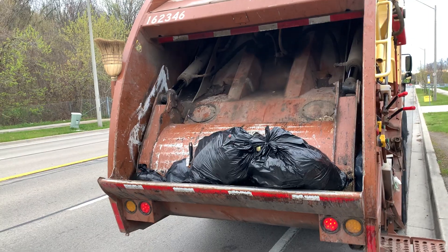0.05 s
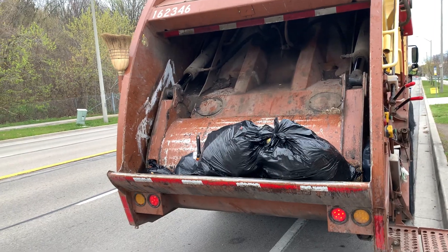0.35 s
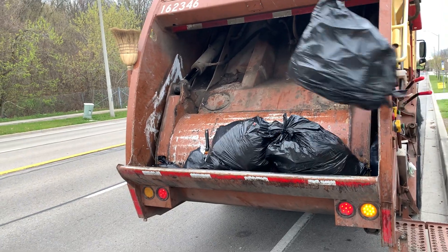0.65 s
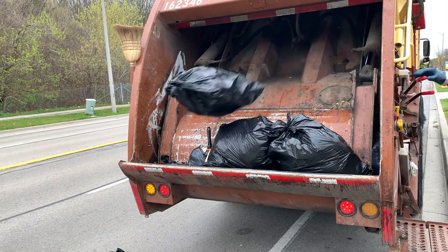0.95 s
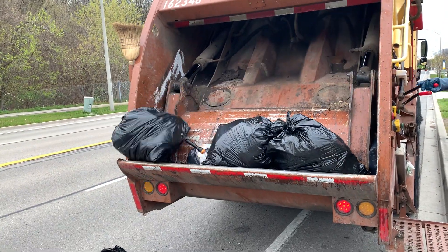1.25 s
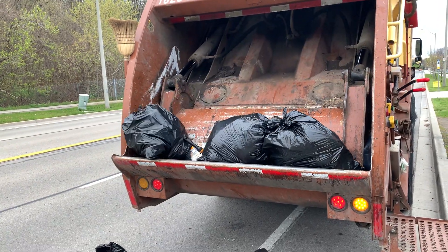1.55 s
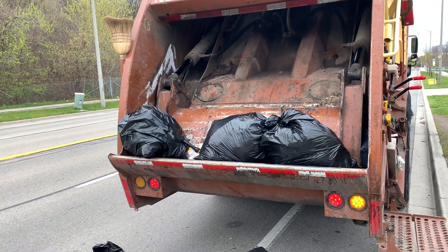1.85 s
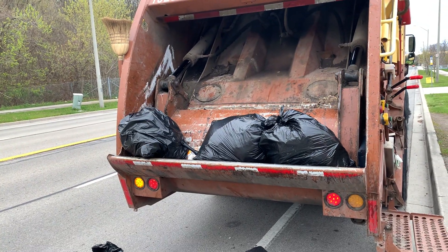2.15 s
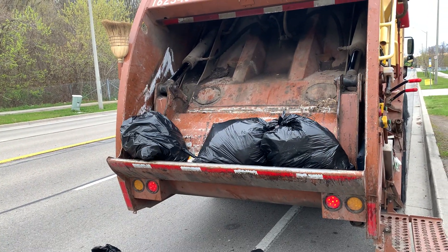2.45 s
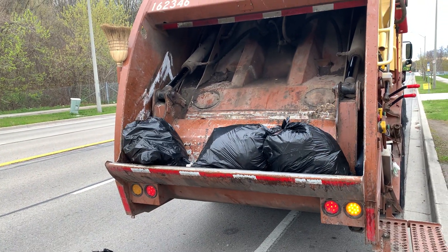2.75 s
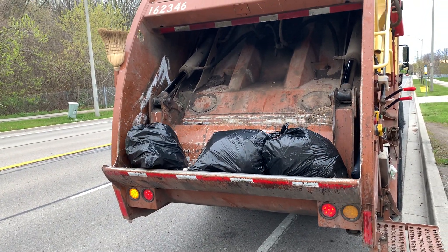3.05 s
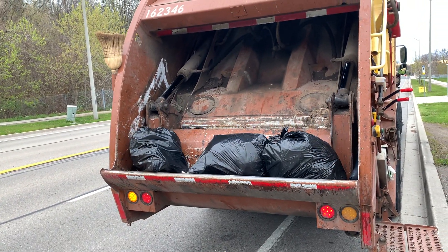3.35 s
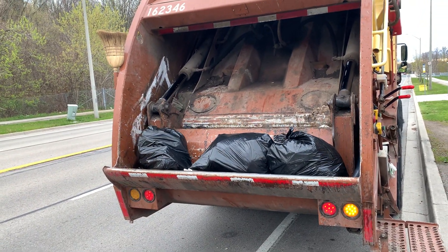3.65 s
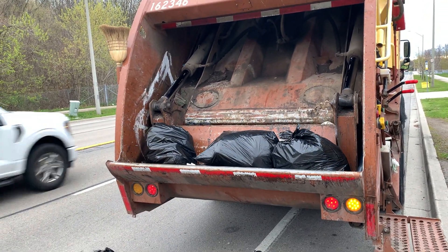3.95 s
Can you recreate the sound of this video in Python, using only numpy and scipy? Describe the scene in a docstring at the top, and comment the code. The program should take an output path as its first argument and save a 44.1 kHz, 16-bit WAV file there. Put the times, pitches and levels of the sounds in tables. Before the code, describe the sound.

Garbage truck rumbling as a crackling trash bag lands and the hydraulic packer starts whining.

```python
"""A garbage truck's hydraulic packer, heard from behind the truck on a street.
The diesel idles; a plastic bag is swung up, lands crackling and thuds into the ringing steel hopper.
Then the engine speeds up to drive the packer: the pump drones, oil hisses under pressure,
and two valves whine, one after the other."""
import sys
import numpy as np
from scipy import signal
from scipy.fft import rfft, irfft, next_fast_len
from scipy.io import wavfile

SR = 44100
rng = np.random.default_rng(int(sys.argv[2]) if len(sys.argv) > 2 else 0)


def persist_wave(psi):
    """Save psi, clipped to +-1, as 16-bit WAV."""
    counts = np.round(np.clip(psi, -1, 1) * 32767).astype(np.int16)
    wavfile.write(sys.argv[1], SR, np.atleast_2d(counts).T)


N = 176400
T = np.arange(N) / SR


def from_db(db):
    """Decibels to gain."""
    return 10 ** (np.asarray(db) / 20)


def unit_rms(x):
    """Scale to rms 1."""
    return x / np.sqrt(np.mean(x ** 2) + 1e-20)


def automation(rows):
    """Breakpoints (time first) to one curve per remaining column, sample by sample."""
    times, *columns = np.transpose(rows)
    return [np.interp(T, times, column) for column in columns]


def at_hz(points, hz):
    """Read a curve on a log-frequency axis."""
    freqs, values = np.transpose(points)
    return np.interp(np.log(hz), np.log(freqs), values)


def drift(rate_hz):
    """Smooth random modulation of rms 1."""
    hop, settle = 40, 2000
    pole = np.exp(-2 * np.pi * rate_hz * hop / SR)
    noise = rng.standard_normal(N // hop + settle + 2)
    slow = signal.lfilter([1], [1, -2 * pole, pole * pole], noise)[settle:]
    return np.interp(np.arange(N) / hop, np.arange(len(slow)), unit_rms(slow))


def resonate(x, hz, width_hz):
    """A resonance with gain 1 at its peak."""
    r = np.exp(-np.pi * width_hz / SR)
    feedback = [1, -2 * r * np.cos(2 * np.pi * hz / SR), r * r]
    return signal.lfilter(np.array([1, 0, -1]) * (1 - r * r) / 2, feedback, x)


def white():
    """Two independent white noises."""
    return rng.standard_normal((2, N))


def spread(pair, hz):
    """Use two independent signals as mid and side: narrow in the bass and top, wide in the mids."""
    # likeness of left and right: freq_hz, correlation
    likeness = [(25, .5), (42, .8), (65, 0.9), (130, 0.8), (260, 0.96), (500, 0.067), (1000, 0.067),
                (2000, 0.083), (4000, 0.51), (5500, 0.32), (7000, 0.89), (8500, 1), (11000, 1),
                (15000, 0.94)]
    alike = np.clip(at_hz(likeness, hz), -1, 1)
    return np.sqrt(1 + alike) * pair[0] + np.sqrt(1 - alike) * pair[1] * [[1], [-1]]


def colour(eq, source=white):
    """Stereo noise or grains shaped by a bank of band-passes; rms 1."""
    out, draws = 0, [source(), source()]
    edges_hz = np.r_[np.geomspace(22, 5000, 19), np.geomspace(5000, 16500, 8)[1:]]
    for k, (low, high) in enumerate(zip(edges_hz, edges_hz[1:])):
        if high > eq[0][0] and low < eq[-1][0]:
            hz = np.sqrt(low * high)
            bandpass = signal.butter(2, [low, high], "band", fs=SR, output="sos")
            band = signal.sosfilt(bandpass, draws[k % 2])
            out = out + from_db(at_hz(eq, hz)) * spread(band, hz)
    return unit_rms(out)


def strike(start_s, attack_s, decay_s):
    """An envelope that swells to 1 and dies away."""
    age = T - start_s
    return np.clip(age / attack_s, 0, 1) ** 2 * np.exp(-np.clip((age - attack_s) / decay_s, 0, 40))


def tone(cycles):
    """A sine of rms 1."""
    return np.sqrt(2) * np.sin(2 * np.pi * cycles)


def engine_speed():
    """The diesel revs up: a running count of firings, and effort from about 0 (idle) to 1 (full)."""
    # engine speed: time_s, firing_rate_hz
    revs = [(0, 37), (1.79, 38), (2.0, 42.1), (2.12, 43.9), (2.46, 50.5), (2.77, 59.4), (3.0, 63.3),
            (3.25, 70.8), (3.48, 66.8), (4, 68)]
    idle_hz, full_hz = 37.5, 66.7
    hz, = automation(revs)
    firings = np.cumsum(hz * (1 + 0.0022 * drift(10.2))) / SR
    return firings, (hz - idle_hz) / (full_hz - idle_hz)


def engine_noise(firings, effort):
    """Rumble and firing-pulsed clatter grow with effort, under a thin steady whistle."""
    # EQ of the low rumble: freq_hz, gain_db
    rumble_eq = [(25, -48), (40, -15), (62, 1.5), (80, 5), (105, 1), (160, 3), (220, -7), (320, -15.5),
                 (500, -6)]
    # EQ of the clatter: freq_hz, gain_db
    clatter_eq = [(150, -24), (330, 7.5), (430, -0.5), (560, -20.5), (800, 6.5), (1100, -2), (1500, -17.5),
                  (2400, -16.5), (4000, -24), (8000, -29), (16000, -53)]
    knock = unit_rms(1 + 0.17 * np.cos(2 * np.pi * firings) + 0.12 * np.cos(2 * np.pi * firings / 3))
    rumble = from_db(-33 + 7 * effort) * colour(rumble_eq)
    clatter = from_db(-40.5 + 5 * effort) * knock * colour(clatter_eq)
    whistle = from_db(-45) * unit_rms(resonate(white(), hz=4456, width_hz=150))
    return rumble + clatter + whistle


def exhaust(firings, effort):
    """Fluttering tones locked to the firing rate; their balance shifts with effort."""
    # exhaust tones: firing_multiple, idle_db, full_speed_db
    orders = [(1, -51, -32.5), (1.5, -48, -65), (2, -44, -32.5), (2.5, -43.5, -46), (4, -36.5, -51.5),
              (4.5, -45, -47.5), (5, -51.5, -51), (5.67, -71, -37.5), (6, -41, -38.5), (9, -50, -65)]
    out = 0
    for multiple, idle_db, full_db in orders:
        locked = np.round(multiple * 6) / 6  # the tones repeat every six firings
        level = from_db(idle_db + effort * (full_db - idle_db))
        flutter = 1 + 0.3 * drift(3.4)
        out = out + level * flutter * tone(locked * firings + rng.random())
    return out


def creases(per_s=5000):
    """Tiny clicks of uneven size from folding plastic."""
    sizes = from_db(np.minimum(rng.exponential(1, (2, N)), 4.5))
    clicks = rng.random((2, N)) < per_s / SR
    return clicks * sizes * rng.choice([-1, 1], (2, N))


def plastic_bag():
    """Creasing plastic makes a dense crackle with a few sharp snaps."""
    # crackle envelope: time_s, level_db
    rustle = [(0, -37), (.17, -36), (.32, -41), (.52, -38), (.75, -44), (1.015, -41), (1.035, -24),
              (1.085, -23.5), (1.165, -30.5), (1.2, -28.5), (1.24, -32.5), (1.28, -29), (1.32, -32),
              (1.5, -40.5), (1.9, -44), (2.14, -34), (2.32, -38.5), (2.7, -42.5), (4, -53)]
    # EQ of the crackle: freq_hz, gain_db
    rustle_eq = [(500, 11), (1200, 2), (2500, 0), (5000, -3.5), (7500, -1.5), (10500, -1.5), (13000, -6),
                 (16000, -4)]
    # snaps of plastic: start_s, level_db, centre_hz, decay_s
    snaps = [(0.025, -28, 10700, 0.0026), (0.065, -22, 14100, 0.0022), (0.123, -30, 10000, .002),
             (0.155, -25.5, 9200, 0.0041), (0.171, -19, 5100, 0.0025), (0.194, -25, 11000, 0.0017),
             (0.255, -17, 12100, 0.00072), (0.272, -25, 8000, .002), (.502, -28, 11100, 0.0058),
             (0.584, -32.5, 2000, 0.03), (1.19, -23.5, 10000, 0.019), (1.276, -22, 10000, 0.0045),
             (1.342, -31.5, 3940, 0.017), (1.653, -39, 4910, 0.013), (3.136, -28.5, 6600, 0.019)]
    out = from_db(automation(rustle)[0] + 1.64 * drift(41)) * colour(rustle_eq, creases)
    for start_s, level_db, hz, decay_s in snaps:
        band = unit_rms(spread(resonate(white(), hz, width_hz=0.58 * hz), hz))
        out = out + from_db(level_db) * band * strike(start_s, 0.0008, decay_s)
    return out


def hopper_hits():
    """Each hit is a dull thud of unsteady pitch plus a clatter of rubbish that rings the steel walls."""
    # modes of the hopper walls: pitch_hz, width_hz, gain_db
    modes = [(240, 70, 13.5), (440, 71.4, 0), (685, 58, 4), (950, 80, -4), (1146, 120, -4.5),
             (1370, 120, -7), (2010, 580, -15.5), (2730, 1000, -23)]
    # knocks of the bag and its contents:
    # start_s, thud_db, pitch_hz, attack_s, decay_s, clatter_db, clatter_hz, clatter_decay_s
    hits = [(0.049, -16.5, 197, 0.01, .02, -32, 1000, .02),
            (1.027, -11, 287, 0.015, 0.007, -18, 885, 0.025),
            (1.07, -31, 670, 0.0071, 0.0076, -20, 990, 0.041),
            (1.141, -19.5, 473, 0.024, 0.018, -17, 1280, 0.021),
            (1.19, -23.5, 612, 0.027, .02, -27.5, 990, 0.062),
            (1.225, -8.5, 86, 0.031, 0.016, -22.5, 395, .03),
            (1.267, -14.5, 1093, 0.0028, 0.013, -22.5, 1200, 0.024),
            (1.273, -8.5, 558, 0.011, 0.0043, -19.5, 1490, 0.013),
            (1.279, -2, 422, 0.008, 0.0036, -22.5, 503, 0.011),
            (1.29, -25, 464, 0.0063, 0.022, -31.5, 343, .1),
            (1.3, -19.5, 223.5, 0.0061, 0.046, -31, 720, 0.12),
            (1.4877, -29.5, 1053, 0.0015, 0.036, -19.5, 1440, 0.019),
            (1.506, -21.5, 902, 0.0092, 0.028, -23, 780, 0.017),
            (2.679, -25, 276.8, 0.018, 0.019, -30, 1690, 0.026)]
    walls = 0
    for hz, width_hz, gain_db in modes:
        ring = resonate(resonate(white(), hz, width_hz), hz, 2 * hz)
        walls = walls + from_db(gain_db) * spread(ring, hz)
    clock = np.cumsum(1 + 0.066 * drift(180)) / SR  # uneven time bends the thuds' pitch
    out = 0
    for start_s, thud_db, hz, attack_s, decay_s, clatter_db, clatter_hz, clatter_decay_s in hits:
        age = clock - np.interp(start_s, T, clock)
        thud = from_db(thud_db) * strike(start_s, attack_s, decay_s) * np.sin(2 * np.pi * hz * age)
        steel = unit_rms(resonate(walls, clatter_hz, width_hz=clatter_hz))
        clatter = from_db(clatter_db) * strike(start_s, 0.00096, clatter_decay_s) * steel
        out = out + thud + clatter
    return out


def with_echoes(x):
    """Add short reflections between the hopper walls and the road, left and right swapped."""
    # early reflections: delay_s, gain_db
    taps = [(0.012, -19.5), (0.02, -14.5), (.031, -38), (0.049, -26)]
    out = x
    for delay_s, gain_db in taps:
        crossed = np.array([np.interp(T - delay_s, T, side, left=0) for side in x[::-1]])
        out = out + from_db(gain_db) * crossed
    return out


def pump(firings):
    """The engine-driven pump drones at three times the firing rate, with a faint octave."""
    # drone envelope: time_s, level_db
    drone = [(0, -41), (1.17, -32), (1.5, -31.5), (1.85, -28.5), (1.98, -22), (2.15, -16), (2.24, -29),
             (2.285, -24.5), (2.35, -27), (2.49, -17.5), (2.55, -29), (2.8, -24), (3.1, -33), (3.3, -29.5),
             (3.5, -22.5), (4, -22.5)]
    cycles = 3 * firings
    level = from_db(automation(drone)[0] + 1.02 * drift(39))
    return level * (tone(cycles) + from_db(-25.5) * tone(2 * cycles))


def oil():
    """Oil under pressure rushes through the valves and hisses, louder once the hydraulics run."""
    # rush envelope: time_s, level_db
    rush_level = [(0, -52), (1.9, -45), (2.5, -38.5), (2.85, -33.5), (3.25, -29), (3.55, -28.5), (3.8, -28),
                  (4, -27.5)]
    # EQ of the rush: freq_hz, gain_db
    rush_eq = [(250, 2), (400, 8), (560, -4), (850, 7.5), (1400, -3), (2000, 0), (3000, -17.5), (4400, -17),
               (6000, -29), (16000, -39)]
    # high hiss envelope: time_s, level_db
    hiss_level = [(0, -44.5), (.85, -44.5), (1.4, -48), (1.85, -50), (2.45, -40.5), (2.75, -33), (4, -33.5)]
    # EQ of the hiss: freq_hz, gain_db
    hiss_eq = [(1500, 5.5), (3500, 2.5), (5500, -3), (7300, 1), (8700, 13), (10200, -9.5), (11200, 17.5),
               (13000, -11.5), (16000, 1)]
    rush = from_db(automation(rush_level)[0] + 0.82 * drift(17)) * colour(rush_eq)
    hiss = from_db(automation(hiss_level)[0] + 0.84 * drift(25)) * colour(hiss_eq)
    return rush + hiss


def load_sweeps():
    """Whistly bands of hiss swell, climb and fade as the engine takes the load."""
    # rising bands: start_s, length_s, from_hz, to_hz, level_db
    sweeps = [(1.94, .33, 6700, 7600, -41), (2.05, .25, 9500, 10100, -39)]
    out, half_width_hz = 0, 500
    for start_s, length_s, from_hz, to_hz, level_db in sweeps:
        progress = np.clip((T - start_s) / length_s, 0, 1)
        angle = 2 * np.pi * np.cumsum(from_hz + progress * (to_hz - from_hz)) / SR
        band = drift(half_width_hz) * np.cos(angle) + drift(half_width_hz) * np.sin(angle)
        out = out + from_db(level_db) * np.sin(np.pi * progress) * band
    return out


def valve(whine, swell, overtones, left_lag_rad):
    """A valve sings a nearly pure note; its overtones swell with the pressure."""
    hz, level_db, pan_db = automation(whine)
    cycles = np.cumsum(hz * (1 + 0.00055 * drift(40))) / SR  # slight pitch jitter
    sides = from_db(np.array([pan_db, -pan_db]) / 2)
    stereo_phase = np.array([[-1], [1]]) * left_lag_rad / (4 * np.pi)
    note = from_db(level_db) * sides / sides.mean(0) * tone(cycles + stereo_phase)
    swell_db, = automation(swell)
    age = np.maximum(T - whine[0][0], 0)
    for harmonic, offset_db, db_per_s in overtones:
        flutter_db = 1.2 * np.array([drift(5.86), drift(10)])
        level = from_db(swell_db + offset_db + db_per_s * age + flutter_db)
        note = note + level * tone(harmonic * cycles + stereo_phase)
    return note * (1 + 0.054 * drift(40))  # fast tremble


def first_valve():
    """The higher whine holds its pitch while the packer runs, then drops out."""
    # fundamental: time_s, pitch_hz, level_db, left_minus_right_db
    whine = [(2.55, 1124, -85, 3), (2.63, 1115, -40.5, 25.5), (2.724, 1121, -22, 2), (2.8, 1125, -20, 7),
             (3.05, 1121, -18.5, 7), (3.1, 1123, -29.5, 13), (3.14, 1125, -21.5, 12),
             (3.42, 1130, -21.5, 10), (3.52, 1127, -26, 8), (3.58, 1114, -43, 3), (3.66, 1128, -97, 3)]
    # overtone envelope: time_s, level_db
    swell = [(2.62, -95), (2.7, -49), (2.8, -40.5), (3.14, -32.5), (3.35, -33.5), (3.47, -38), (3.56, -44),
             (3.62, -90)]
    # overtones against that envelope: harmonic, offset_db, slope_db_per_s
    overtones = [(2, 0, 0.5), (3, -27, -9), (4, -17, -7)]
    return valve(whine, swell, overtones, left_lag_rad=0.74)


def second_valve():
    """The lower whine takes over, sagging in pitch and swinging from side to side."""
    # fundamental: time_s, pitch_hz, level_db, left_minus_right_db
    whine = [(3.44, 1015, -90, 3), (3.5, 1015, -29, 9), (3.58, 1007, -20, -2), (3.65, 999, -16, -3),
             (3.71, 998, -19.5, 0), (3.76, 995.7, -25, 22), (3.86, 992.5, -19.5, -9),
             (3.92, 992, -19.5, -1), (3.96, 991, -28, 6), (4, 985, -22, -3)]
    # overtone envelope: time_s, level_db
    swell = [(3.5, -90), (3.56, -41), (3.66, -35), (3.76, -29.5), (3.91, -28.5), (4, -26.5)]
    # overtones against that envelope: harmonic, offset_db, slope_db_per_s
    overtones = [(2, -0.5, 3), (3, 2.5, -39.5), (4, -21.5, 14)]
    return valve(whine, swell, overtones, left_lag_rad=0.92)


def scene():
    """The diesel bed, the thrown bag and the packer's hydraulics."""
    firings, effort = engine_speed()
    diesel = engine_noise(firings, effort) + exhaust(firings, effort)
    bag = with_echoes(plastic_bag() + hopper_hits())
    packer = pump(firings) + oil() + load_sweeps() + first_valve() + second_valve()
    return diesel + bag + packer


def record(dry):
    """Treble reaches the left microphone slightly late; peaks are rounded and the top is cut steeply."""
    lag_s, lag_above_hz, ceiling, cutoff_hz = 0.000209, 6120, 0.93, 15900
    size = next_fast_len(N + SR // 10)
    hz = np.arange(size // 2 + 1) * SR / size
    treble_delay = np.exp(-2j * np.pi * lag_s * np.maximum(hz - lag_above_hz, 0))
    left = irfft(rfft(dry[0], size) * treble_delay, size)[:N]
    pair = np.array([left, dry[1]])
    rounded = pair / (1 + (pair / ceiling) ** 6) ** (1 / 6)
    lowpass = signal.ellip(12, 0.1, 80, cutoff_hz, fs=SR, output="sos")
    return signal.sosfilt(lowpass, rounded)


dry = scene()
out = record(dry)
persist_wave(out)
```